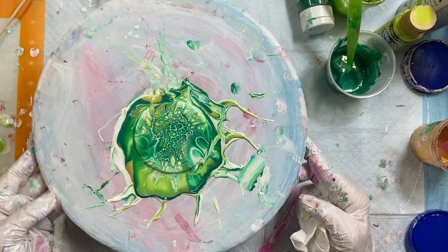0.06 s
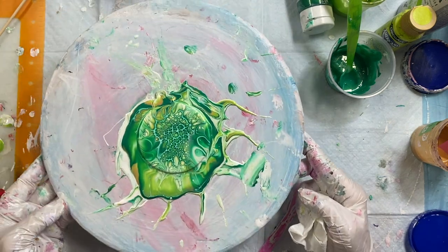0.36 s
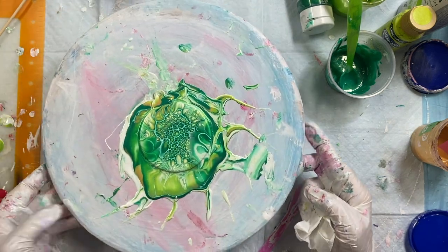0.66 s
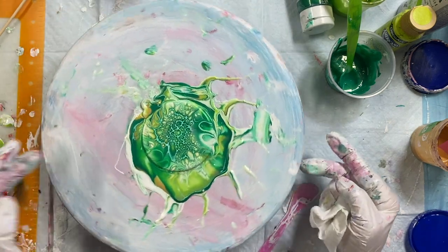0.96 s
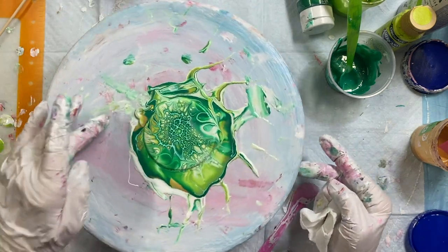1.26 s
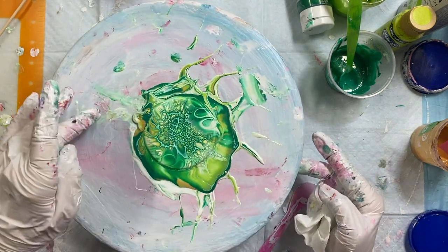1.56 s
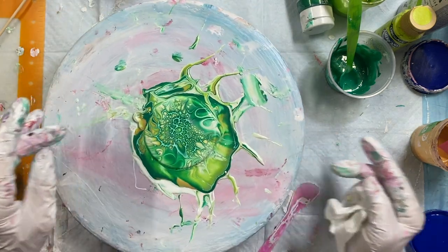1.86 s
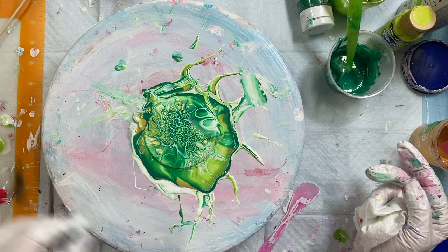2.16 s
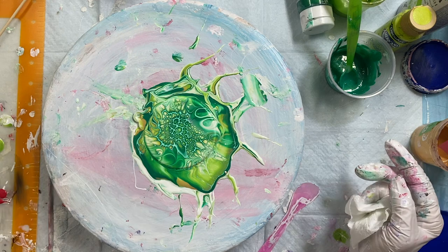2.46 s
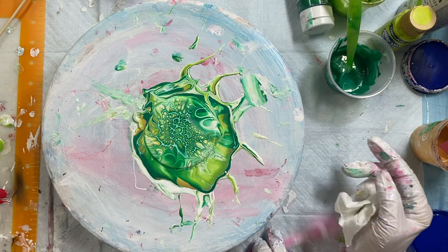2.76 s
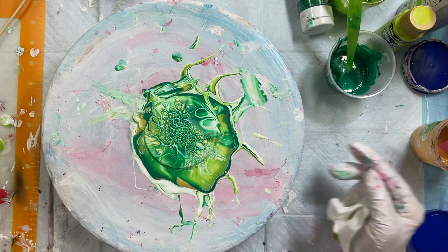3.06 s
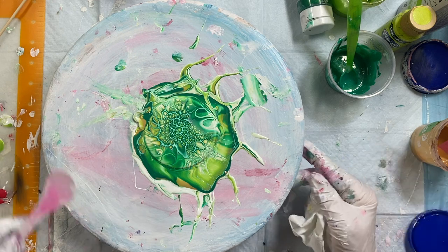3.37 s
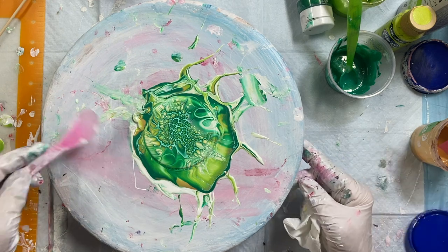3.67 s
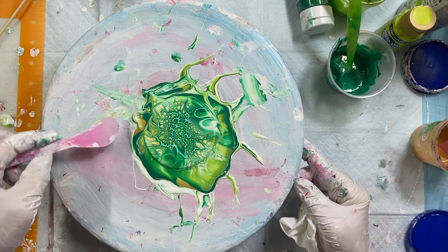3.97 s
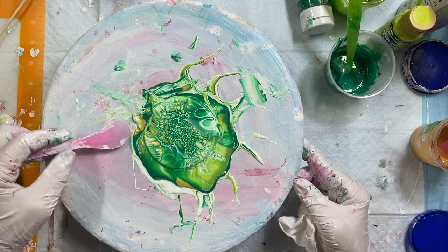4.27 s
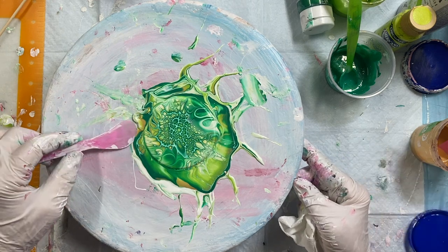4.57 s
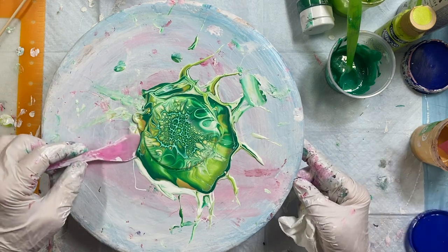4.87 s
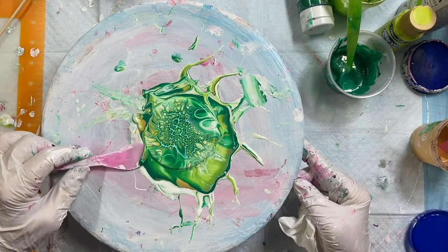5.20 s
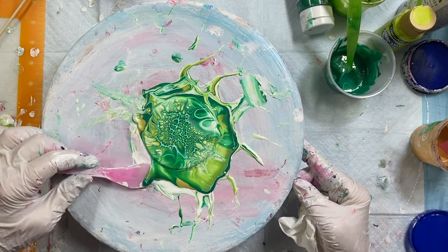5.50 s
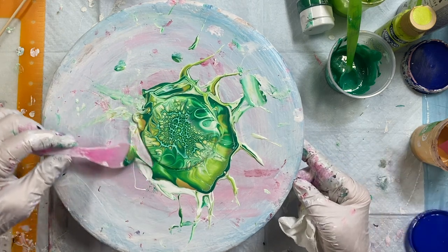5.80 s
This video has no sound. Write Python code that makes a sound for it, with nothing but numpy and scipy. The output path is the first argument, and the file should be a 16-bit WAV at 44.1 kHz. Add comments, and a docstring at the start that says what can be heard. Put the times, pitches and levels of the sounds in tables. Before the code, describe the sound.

Heard close from overhead in a quiet, faintly humming room, a board is spun on a turntable: sharp hollow knocks, a ticking rattle and a rumble that dies away within about a second. After a lull come soft table thuds and the crinkling of gloves and paper towel. Near the end, a plastic spatula taps the board and drags through wet paint with a faint, sticky scrape.

```python
"""A turntable rumbles as gloved hands spin the painted board on it: tiny ticks of the bearing balls
make the board sound hollow. Fingers knock on the board and hands bump the table. After the spin,
gloves and a wad of paper towel rustle and crackle. Then a plastic spatula sticks and slips as it is
drawn through wet paint. It is all heard from close above, in a quiet room with a faint hum."""
import sys
import numpy as np
from scipy import signal
from scipy.fft import rfft, irfft, next_fast_len
from scipy.io import wavfile
from scipy.ndimage import uniform_filter1d

SR = 44100
rng = np.random.default_rng(int(sys.argv[2]) if len(sys.argv) > 2 else 0)


def store_pcm(level_fs):
    """Save levels as 16-bit WAV."""
    pcm = np.round(np.clip(level_fs, -1, 1) * 32767).astype(np.int16)
    wavfile.write(sys.argv[1], SR, np.atleast_2d(pcm).T)


N = 266364
TIME = np.arange(N) / SR

# tone of the room's steady hiss: (frequency [Hz], relative level [dB])
AIR_TONE = [(25, -31), (65, 10.5), (130, -15), (300, -4.5), (1500, -7.5), (8000, -16), (12000, -19),
            (15500, -28)]
# the room's low rumble comes and goes: (time [s], level [dB])
ROOM_RUMBLE = [(0, -63), (1.45, -67), (1.6, -81), (3.1, -73), (3.6, -64.5), (6.04, -68)]
# tone of that rumble: (frequency [Hz], relative level [dB])
ROOM_RUMBLE_TONE = [(30, -9), (60, -0.5), (180, -5), (420, -14), (750, -17), (1600, -34.5)]
# the notes of the hum: (frequency [Hz], base level [dB])
HUM_NOTES = [(479, -83.5), (720, -81.5)]
# sharp snaps of glove, paper and plastic: (time [s], level [dB], pitch [Hz])
SNAPS = [(0.0342, -47.5, 3100), (0.0475, -40.5, 2400), (.1495, -57, 2600), (0.518, -30, 3000),
         (0.6365, -31.5, 5230), (.641, -40, 1900), (1.192, -49, 6100), (2.571, -44.5, 5000),
         (2.617, -41, 6000), (2.6616, -38, 7600), (2.7395, -35.5, 3880), (2.787, -41.5, 1237),
         (2.977, -44.5, 2400), (3.107, -43, 3030), (3.809, -48, 4400), (4.047, -54, 6970),
         (5.876, -47.5, 11000)]
# knocks on the board: (time [s], peak [dB], boost of higher notes [dB per octave], click level [dB])
KNOCKS = [(0.038, -41.5, -2, -66), (0.311, -47, -7, -66), (0.4797, -14.5, 2.5, -31.5), (.518, -32, 14, -46),
          (.533, -30, 2, -57), (0.585, -31, 11, -42), (0.6, -30.5, 10, -42), (.642, -34.5, 9, -58),
          (0.7267, -24, -2, -40.5), (.747, -29, -3, -62), (.760, -25, 0, -60), (.769, -25, 6, -60),
          (.819, -31.5, -2, -58), (0.876, -32, 1, -46), (0.956, -30, 9, -37), (1.053, -31, 3, -53),
          (1.191, -33.5, 7, -41), (1.238, -21, 3, -39.5), (1.643, -40.5, 11, -56), (4.682, -40, -1, -60),
          (5.014, -40, -0.5, -57), (5.876, -62, 11, -61.5)]
# the notes the board rings with: (frequency [Hz], relative level [dB], time to fade by 60 dB [s])
BOARD_NOTES = [(305, -12, 0.042), (404, -1, 0.03), (478, 1.5, 0.029), (565, -2.5, 0.025), (665, -3.5, 0.02),
               (835, -8, 0.016), (1020, -14, 0.017)]
# pushes that set the bearing rolling: (start [s], level [dB], time to speed up [s], time to stop [s])
PUSHES = [(.29, -60.5, 0.027, 1), (0.49, -42, 0.018, 0.53), (0.69, -38, 0.038, 0.78),
          (3.471, -62.5, 0.012, 0.29), (4.66, -54, 0.014, 0.17), (4.8, -59.5, 0.084, 0.098)]
# how fast the bearing turns, which sets its tone: (time [s], share of full speed [0-1])
SPIN_SPEED = [(.8, 0.22), (1.05, 0.16), (1.4, 0.055)]
# tone of the board when something rolls or drags on it: (frequency [Hz], relative level [dB])
BOARD_TONE = [(50, -19), (90, -2.5), (170, -5), (245, -3), (305, -1.5), (370, -7), (480, -5), (670, -7),
              (820, -10), (1100, -10.5), (1600, -14)]
# faint notes of the steel track the balls run in: (frequency [Hz], relative level [dB])
STEEL_NOTES = [(1770, -7), (2090, -4), (3960, 1), (5150, -5), (7550, -7)]
# the bearing's sliding noise during the spin: (time [s], base level [dB])
BEARING_SLIDE = [(0.28, -81), (0.312, -73), (.475, -71), (.52, -62.5), (0.656, -65), (0.898, -64),
                 (0.992, -73), (1.5, -90.5)]
# hiss of anything that slides, glove and paper above all: (frequency [Hz], relative level [dB])
HISS_TONE = [(300, 0.5), (700, 0), (1200, -22), (2500, -9), (5000, -2), (7800, 1.5), (10000, 1),
             (15500, -4)]
# coarser crackle of folds and of the grinding bearing: (frequency [Hz], relative level [dB])
CRACKLE_TONE = [(600, -12), (1400, -4.5), (3500, -1), (4500, -1), (5200, -7.5), (8000, -33)]
# soft bumps on the table: (time [s], peak [dB], pitch [Hz])
BUMPS = [(0.489, -43, 92), (0.749, -45.5, 86.5), (2.548, -44.5, 116.3), (2.572, -43, 119),
         (2.594, -37.5, 73.7), (3.566, -49, 92.4), (4.705, -42.5, 200)]
# the loose bearing rattles when shoved: (time [s], level [dB])
RATTLE_LEVEL = [(.505, -59), (.53, -51.5), (.645, -56.5), (.69, -68)]
# the notes of that rattle: (frequency [Hz], relative level [dB])
RATTLE_NOTES = [(1240, 2.5), (1400, 2), (1810, -0.5)]
# glove and paper towel strokes: (peak time [s], hiss level [dB], crackle level [dB], length [s])
STROKES = [(1.11, -71, -79, 0.032), (1.667, -62.5, -62.5, 0.027), (2.196, -67, -69, 0.037),
           (2.264, -67.5, -73.5, 0.045), (2.549, -56, -59.5, 0.048), (2.609, -51.5, -55, 0.042),
           (2.744, -52, -55.5, 0.046), (2.788, -48, -58.5, 0.028), (2.869, -63.5, -72, 0.049),
           (3.012, -66.5, -64.5, 0.081), (3.089, -53, -65, 0.062), (3.242, -55.5, -60.5, 0.035),
           (3.284, -58.5, -60, 0.036), (3.379, -67, -67.5, 0.08), (3.524, -57, -59.5, 0.038),
           (3.698, -67, -62.5, 0.043), (3.821, -58, -61, 0.025)]
# a glove catches and scuffs: (peak time [s], level [dB], pitch [Hz], length [s])
SCUFFS = [(1.251, -57, 2400, 0.043), (1.447, -73.5, 2950, 0.06), (2.456, -75, 1224, 0.089),
          (2.796, -56, 1070, 0.035), (3.066, -54.5, 2830, 0.028), (3.105, -52.5, 2720, 0.018),
          (3.695, -54, 3600, 0.02)]
# short dry scrapes of the blade on the board: (start [s], length [s], level [dB])
DRY_SCRAPES = [(4.721, 0.037, -68), (4.786, 0.16, -66), (5.548, 0.056, -67.5)]
# tone of those scrapes: (frequency [Hz], relative level [dB])
DRY_SCRAPE_TONE = [(1500, -7), (2500, -3.5), (3200, 1.5), (4300, 2.5), (5400, -10.5), (6700, -2),
                   (8200, -21)]
# the long pull through the paint: (time [s], base rasp level [dB], base wet hiss level [dB])
PAINT_PULL = [(4.98, -78, -101), (5.026, -65, -80), (5.14, -66, -67), (5.236, -70.5, -81),
              (5.418, -59, -78), (5.486, -67.5, -86), (5.505, -100, -103)]
# tone of the pull's rasp: (frequency [Hz], relative level [dB])
RASP_TONE = [(1300, -14), (2200, -5.5), (3000, -3), (4100, 0.5), (5200, -3), (7000, -5.5), (10000, -15)]
# the pressed blade rings and makes the board sound too: (time [s], base level [dB], blade pitch [Hz])
BLADE_PRESS = [(5.06, -75.5, 570), (5.3, -61.5, 840), (5.41, -58.5, 845), (5.499, -76.5, 660)]
# how alike the left and right microphones hear: (frequency [Hz], likeness [0-1])
LIKENESS = [(400, 0.8), (1000, 0.45), (2200, 0.27), (6000, 0.4), (9000, 0.99)]
# how much louder the left side is: (frequency [Hz], left minus right [dB])
LEFT_BOOST = [(120, 0.5), (500, 1.5), (1100, 1), (2800, 3), (7500, 0)]
# how far the right side's waves run ahead in the treble: (frequency [Hz], lead [half cycles])
RIGHT_LEAD = [(6800, 0), (8800, 1), (9500, 1), (10600, 2), (11600, 2), (13000, 3), (13800, 3), (14700, 4)]


def undb(db):
    """Turn decibels into a number to multiply by."""
    return 10 ** (np.asarray(db) / 20)


def unit(x):
    """Scale a sound to an average strength (rms) of 1."""
    return x / np.sqrt(np.mean(x ** 2))


def along(points, hz):
    """Read between the rows of a (frequency, value) table, with octaves evenly spaced."""
    f, value = np.transpose(points)
    return np.interp(np.log(hz + 1), np.log(f), value)


def swell(table, column=1):
    """Smooth loudness curve from a table's dB column, silent before and after it."""
    rows = np.array(table)
    db = np.interp(TIME, rows[:, 0], rows[:, column], left=-np.inf, right=-np.inf)
    return uniform_filter1d(undb(db), size=128)


def shape(x, tone):
    """Give a sound the tone in a table, fading beyond its ends; strength 1."""
    size = next_fast_len(N, True)
    hz = np.fft.rfftfreq(size, 1 / SR)
    low_cut = 1 + (.7 * tone[0][0] / (hz + 1)) ** 4
    high_cut = 1 + (.7 * hz / tone[-1][0]) ** 4
    gain = undb(along(tone, hz)) / np.sqrt(low_cut * high_cut)
    return unit(irfft(rfft(x, size) * gain, size)[..., :N])


def keep_band(x, kind, hz, order):
    """Keep the lows, the highs or a band between; a higher order cuts more sharply."""
    return signal.sosfilt(signal.butter(order, hz, kind, fs=SR, output="sos"), x)


def resonate(x, hz, q):
    """Keep the sound near one pitch; a higher q is narrower."""
    return signal.lfilter(*signal.iirpeak(min(hz, SR / 3), max(q, .7), fs=SR), x)


def ring_notes(x, notes, q):
    """Let a sound set several notes ringing; strength 1."""
    return unit(sum(undb(db) * unit(resonate(resonate(x, hz, q), hz, q)) for hz, db in notes))


def grains(per_s, spread_db, decay_s, smooth):
    """Two noises that flare with the same random little slips, over a smooth share."""
    happens = rng.random(N) < per_s / SR
    sizes = undb(spread_db * np.minimum(rng.standard_exponential(N), 4.5))
    power = signal.lfilter([1], [1, -np.exp(-2 / (decay_s * SR))], happens * sizes ** 2)
    return np.sqrt(power / power.mean() + smooth) * rng.standard_normal((2, N))


def burst(db, hz, decay_s, q):
    """Noise around one pitch that starts at once and dies away."""
    fade = np.exp(-np.arange(SR // 8) / SR / decay_s)
    noise = resonate(rng.standard_normal((2, len(fade))) * fade, hz, q)
    noise = resonate(noise, hz, q=0.7)
    return undb(db) * unit(noise) * np.sqrt(np.mean(fade ** 2))


def ring(t, hz, decay_s, build_cycles):
    """A fading note that takes a cycle or so to build, so low notes arrive later."""
    build = 1 - np.exp(-(t * hz / build_cycles) ** 2)
    return np.sin(2 * np.pi * hz * t) * np.exp(-t / decay_s) * build


def stroke(s, length_s, rise_share=0.4):
    """Power of a rub that swells to its peak at time s and dies a little more slowly."""
    power, near = np.zeros(N), np.abs(TIME - s) < 4 * length_s
    t = TIME[near] - s
    width_s = length_s * np.where(t < 0, rise_share, 1 - rise_share)
    power[near] = np.exp(-np.abs(t / width_s) ** 1.42)
    return power


def room_tone():
    """Steady hiss, a low rumble and two faint, slightly wavering notes of hum."""
    air = undb(-74) * shape(rng.standard_normal((2, N)), AIR_TONE)
    rumble = swell(ROOM_RUMBLE) * shape(rng.standard_normal((2, N)), ROOM_RUMBLE_TONE)
    hum = 0
    for hz, db in HUM_NOTES:
        waver = 0.61 * unit(resonate(rng.standard_normal((2, N)), hz, q=160))
        hum += undb(db) * (np.sqrt(2) * np.sin(2 * np.pi * hz * TIME) + waver)
    hum_rise = undb(np.interp(TIME, (2.1, 3.1), (-3, 3)))
    return air + rumble + hum * hum_rise


def snap(db, hz, q, decay_cycles=3.7):
    """A fold lets go with a pop lasting a millisecond or so."""
    return burst(db, hz, decay_cycles / hz, q)


def snaps():
    """Glove, paper and plastic give single sharp pops."""
    out = np.zeros((2, N))
    for s, db, hz in SNAPS:
        add(out, s, snap(db, hz, q=1.23))
    return out


def add(track, s, sound):
    """Mix a short sound in at time s."""
    i = max(int(s * SR), 0)
    track[..., i:i + sound.shape[-1]] += sound[..., :N - i]


def knocks(scatter_db=3.5):
    """Fingers and blade tap the board: harder contact favours high notes, and each spot shifts the mix."""
    out, t = np.zeros((2, N)), np.arange(SR // 6) / SR
    spots = scatter_db * rng.standard_normal((len(KNOCKS), len(BOARD_NOTES)))
    for (s, db, boost_db, click_db), shifts in zip(KNOCKS, spots):
        notes = 0
        for (hz, note_db, fade_s), shift_db in zip(BOARD_NOTES, shifts):
            octaves_up = np.log2(hz / BOARD_NOTES[0][0])
            note = ring(t, hz, fade_s / np.log(1000), build_cycles=1.1)  # a gloved fingertip is soft
            notes += undb(note_db + shift_db + boost_db * octaves_up) * note
        blow = keep_band(notes, "highpass", 230, order=4)
        add(out[0], s, undb(db) * blow / np.abs(blow).max())
        click = burst(click_db, hz=3080, decay_s=0.002, q=0.76)
        add(out, s, keep_band(click, "lowpass", 4900, order=8))  # soft things make little treble
    return out


def rolling_loudness(coast_power=1.05):
    """Each push speeds the bearing up, then friction slows it evenly; the rumble follows the speed."""
    power = 0
    for s, db, rise_s, coast_s in PUSHES:
        speed = np.interp(TIME, (s, s + rise_s, s + rise_s + coast_s), (0, 1, 0))
        power += (undb(db) * speed ** coast_power) ** 2
    return np.sqrt(power)


def turntable():
    """Balls tick along their steel track; the board turns the ticks into a hollow rumble."""
    ticks = grains(per_s=540, spread_db=3.65, decay_s=0.0013, smooth=0.55)
    wide = shape(ticks, BOARD_TONE)
    narrow = unit(keep_band(wide, "bandpass", (170, 760), order=2))
    speed = np.interp(TIME, *np.transpose(SPIN_SPEED))
    rumble = speed * wide + (1 - speed) * narrow  # the tone narrows as the spin dies
    sliding = grains(per_s=920, spread_db=0.5, decay_s=0.0013, smooth=0.51)
    hiss = undb(5.5) * shape(sliding, HISS_TONE)
    grind = undb(4) * shape(sliding[::-1], CRACKLE_TONE)
    steel = undb(-0.5) * ring_notes(ticks, STEEL_NOTES, q=15)
    return rolling_loudness() * rumble + swell(BEARING_SLIDE) * (hiss + grind + steel)


def bumps(decay_cycles=1.8):
    """The heel of a hand meets the table: a low thud, and a flap of the loose cover."""
    out, t = np.zeros((2, N)), np.arange(SR // 4) / SR
    for s, db, hz in BUMPS:
        thud = ring(t, hz, decay_cycles / hz, build_cycles=0.32)
        add(out[0], s, undb(db) * thud / np.abs(thud).max())
        flap = burst(db - 14.5, hz=262, decay_s=0.019, q=1)
        add(out, s, flap)
    return out


def rattle():
    """Loose balls chatter in their track just after the first hard shove."""
    chatter = grains(per_s=400, spread_db=4.0, decay_s=0.001, smooth=0.17)
    return swell(RATTLE_LEVEL) * ring_notes(chatter, RATTLE_NOTES, q=7.6)


def rustle():
    """Glove and paper rub: sliding fibres hiss, and buckling folds add a coarser, lower crackle."""
    hiss_power, fold_power = 0, 0
    for s, hiss_db, fold_db, length_s in STROKES:
        rub = stroke(s, length_s)
        hiss_power += undb(hiss_db) ** 2 * rub
        fold_power += undb(fold_db) ** 2 * rub
    hiss = shape(grains(per_s=800, spread_db=3.2, decay_s=0.0018, smooth=0.25), HISS_TONE)
    folds = shape(grains(per_s=570, spread_db=3.7, decay_s=0.0015, smooth=0.45), CRACKLE_TONE)
    return np.sqrt(hiss_power) * hiss + np.sqrt(fold_power) * folds


def crinkles(per_s=110, centre_hz=4330, scatter_octaves=0.52, above_hiss_db=2, scatter_db=3.5):
    """Creases pop at random around the peak of each stroke, each with a pitch of its own."""
    out = np.zeros((2, N))
    for s, hiss_db, _, length_s in STROKES:
        creases = np.clip(rng.standard_normal((int(per_s * length_s), 3)), -2, 2)
        for when, pitch, size in creases:
            hz = centre_hz * 2 ** (scatter_octaves * pitch)
            db = hiss_db + above_hiss_db + scatter_db * size
            add(out, s + when * length_s / 2, snap(db, hz, q=2))
    return out


def scuffs(width_octaves=0.72):
    """A catching glove sticks and slips, making noise in one narrow band."""
    slips = grains(per_s=840, spread_db=5.0, decay_s=0.0032, smooth=0.41)
    out = 0
    for s, db, hz, length_s in SCUFFS:
        edges_hz = hz * 2 ** (np.array([-.5, .5]) * width_octaves)
        scuff = unit(keep_band(slips, "bandpass", edges_hz, order=2))
        out += undb(db) * np.sqrt(stroke(s, length_s)) * scuff
    return out


def spatula(rise_s=0.0055, fall_s=0.0073):
    """The blade sticks and slips, wet paint hisses under it, and its pitch rises as it is pressed."""
    slips = grains(per_s=2000, spread_db=5.5, decay_s=0.0035, smooth=0.75)
    scraping = 0
    for s, length_s, db in DRY_SCRAPES:
        scraping += undb(db) * np.interp(TIME - s, (0, rise_s, length_s, length_s + fall_s), (0, 1, 1, 0))
    scrapes = scraping * shape(slips, DRY_SCRAPE_TONE)
    rasp = undb(1) * swell(PAINT_PULL) * shape(slips, RASP_TONE)
    wet = undb(4) * swell(PAINT_PULL, column=2) * shape(rng.standard_normal((2, N)), HISS_TONE)
    # keep only the noise within about 230 Hz of the blade's gliding pitch
    times, _, hz = np.transpose(BLADE_PRESS)
    glide = np.exp(2j * np.pi * np.cumsum(np.interp(TIME, times, hz)) / SR)
    blade = unit(np.real(keep_band(slips / glide, "lowpass", 230, order=2) * glide))
    pressed = undb(1.5) * swell(BLADE_PRESS) * (blade + shape(slips, BOARD_TONE))
    return scrapes + rasp + wet + pressed


def room_echo(x, fade_s, echo_db):
    """Table and walls add a short, faint echo, thin in the bass; it drops 60 dB in fade_s."""
    t = np.arange(SR // 2) / SR
    tail = rng.standard_normal((2, len(t))) * np.exp(-np.log(1000) * t / fade_s) * (t > .004)
    for _ in range(2):
        tail = keep_band(tail, "highpass", 676, order=1)
    tail *= undb(echo_db) / np.sqrt(np.sum(tail[0] ** 2))
    return x + signal.fftconvolve(x[:1], tail, axes=1)[:, :N]


def scene():
    """Mix to left and right. Each source has two rows: what both sides share, and how they differ."""
    sources = turntable() + rattle() + rustle() + crinkles() + scuffs()
    sources += spatula() + knocks() + bumps() + snaps()
    in_room = room_echo(sources, fade_s=0.13, echo_db=-7) + room_tone()
    size = next_fast_len(N + 2048, True)
    hz = np.fft.rfftfreq(size, 1 / SR)
    shared, differing = rfft(in_room, size)
    alike = along(LIKENESS, hz)
    side = np.array([[1], [-1]])  # left, right
    pair = shared * np.sqrt((1 + alike) / 2) + side * differing * np.sqrt((1 - alike) / 2)
    balance = undb(side * along(LEFT_BOOST, hz) / 2)
    return irfft(pair * balance, size)[:, :N]


def record(dry, top_hz=15850):
    """The two microphones fall out of step in the treble, and the very top is cut off."""
    size = next_fast_len(N + 2048, True)
    hz = np.fft.rfftfreq(size, 1 / SR)
    left, right = rfft(dry, size)
    lead = np.exp(1j * np.pi * np.interp(hz, *np.transpose(RIGHT_LEAD)))
    pair = irfft(np.array([left, right * lead]), size)[:, :N]
    return signal.sosfilt(signal.ellip(10, .2, 70, top_hz, fs=SR, output="sos"), pair)


dry = scene()
out = record(dry)
store_pcm(out)
```